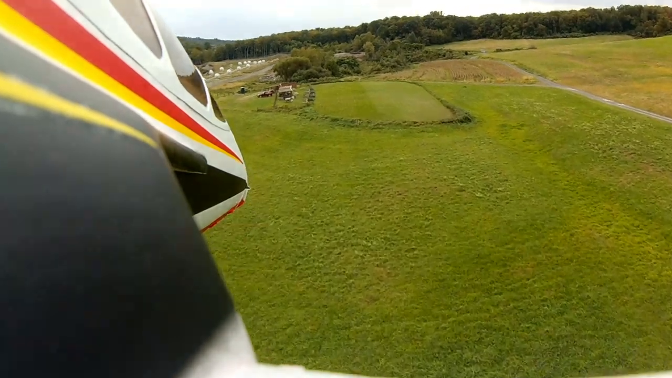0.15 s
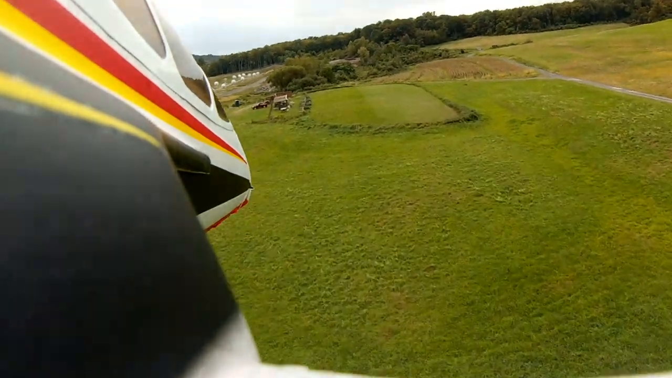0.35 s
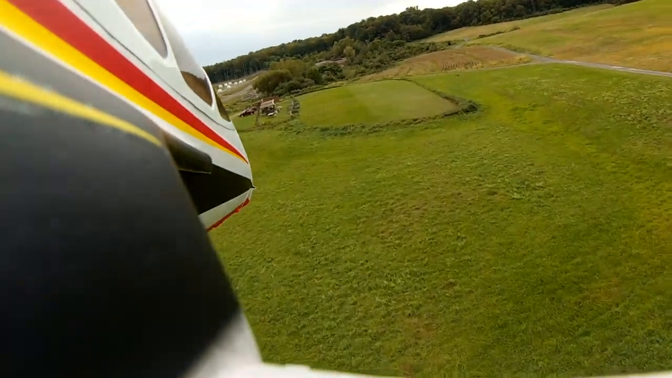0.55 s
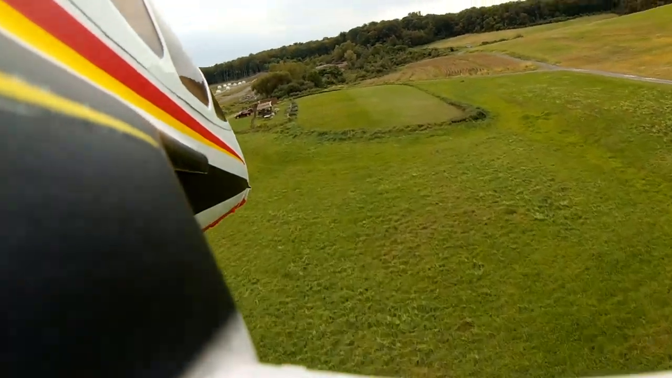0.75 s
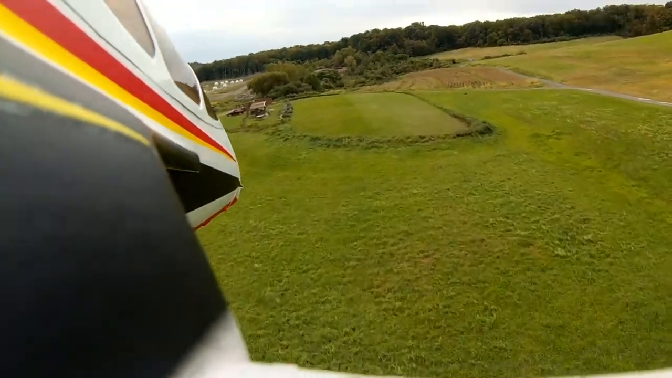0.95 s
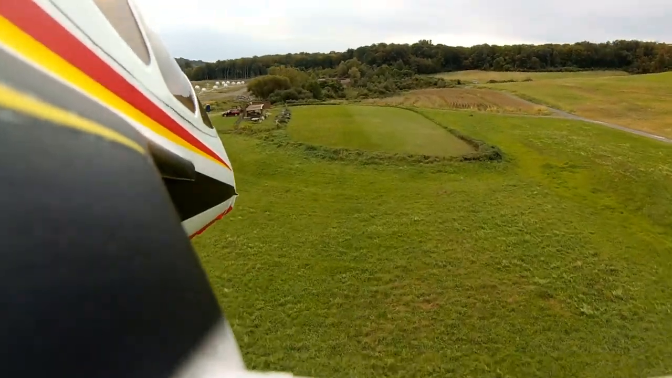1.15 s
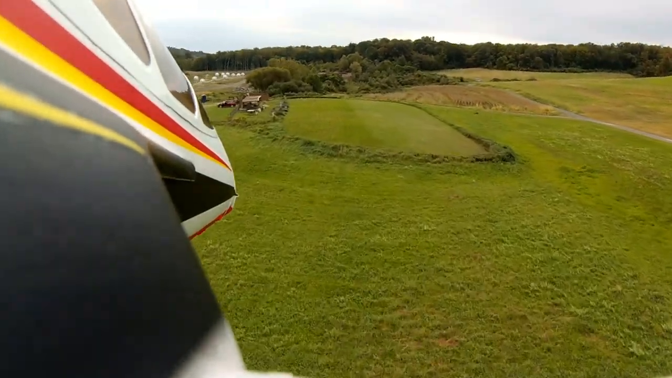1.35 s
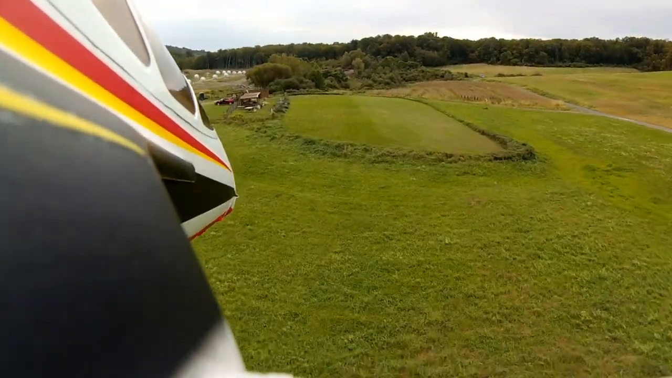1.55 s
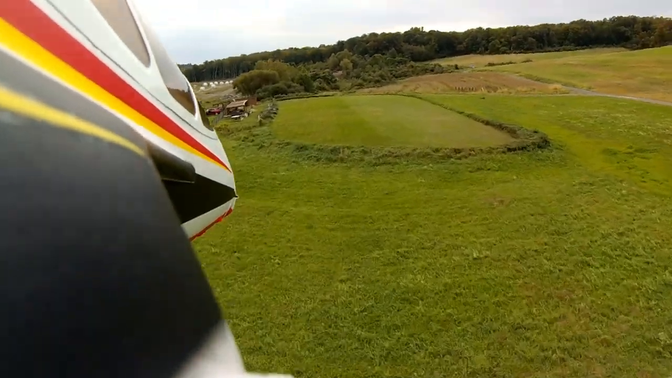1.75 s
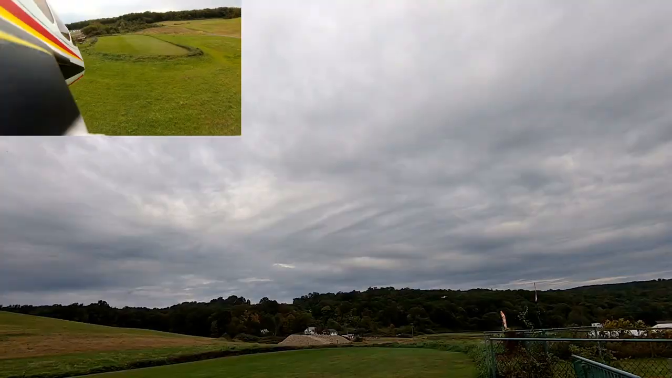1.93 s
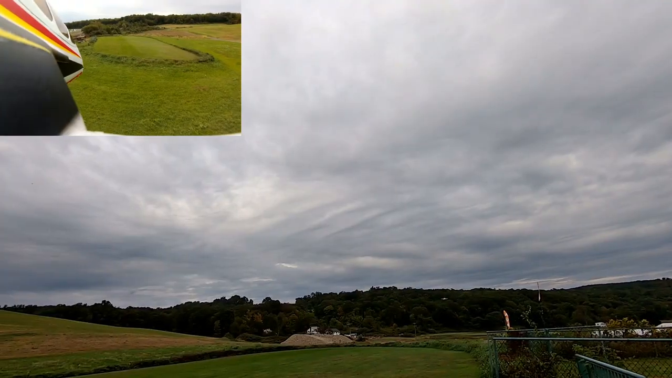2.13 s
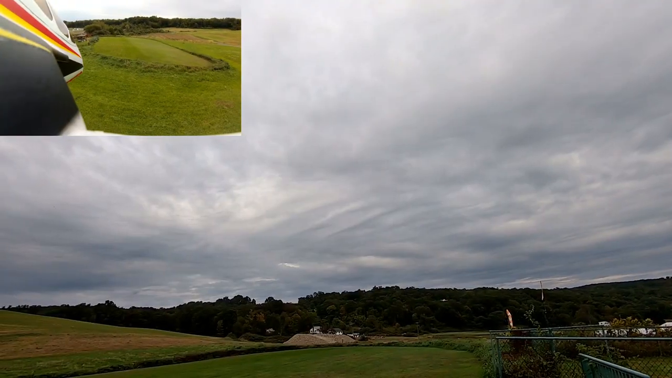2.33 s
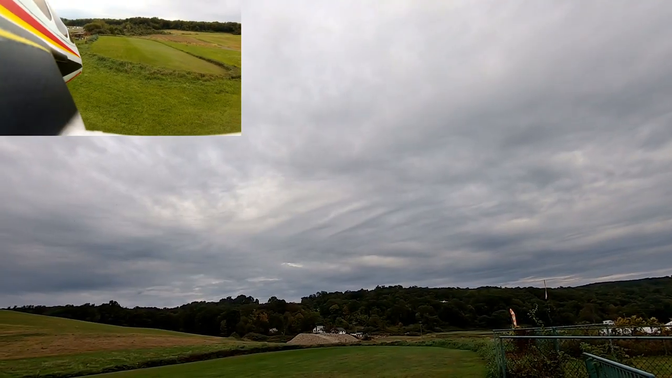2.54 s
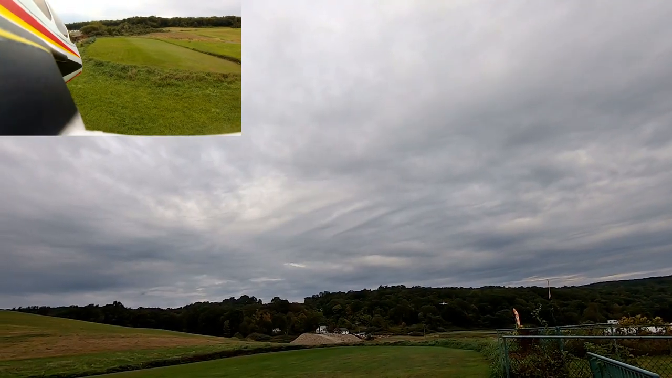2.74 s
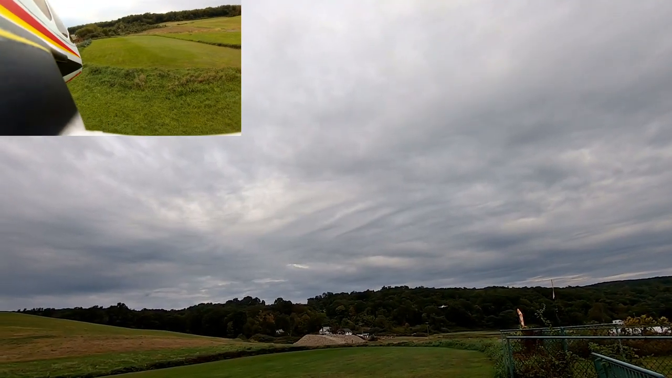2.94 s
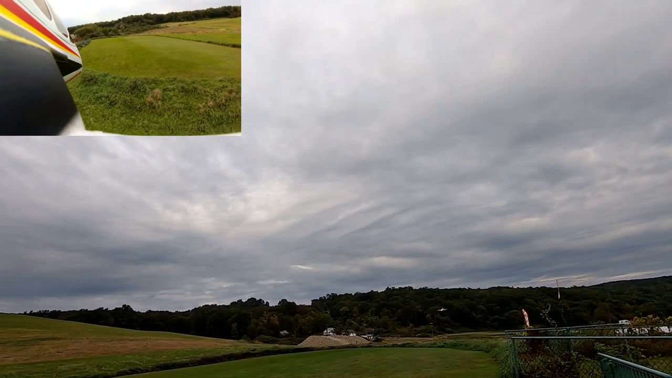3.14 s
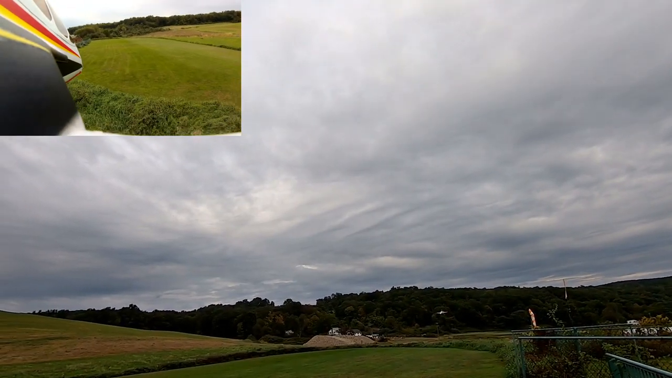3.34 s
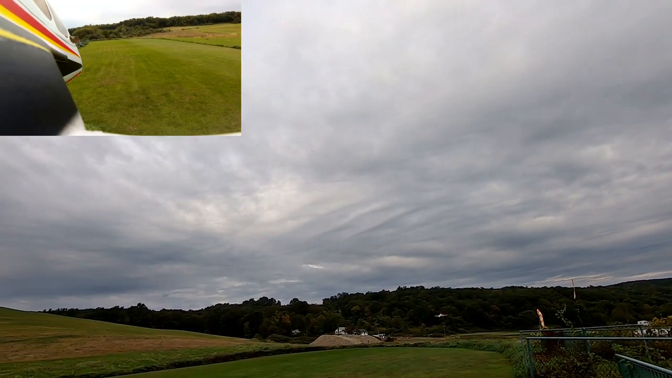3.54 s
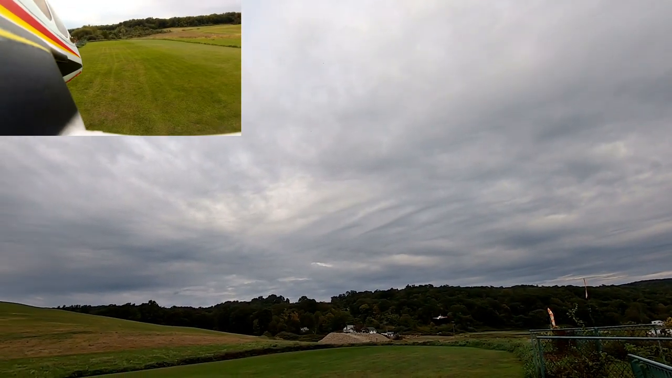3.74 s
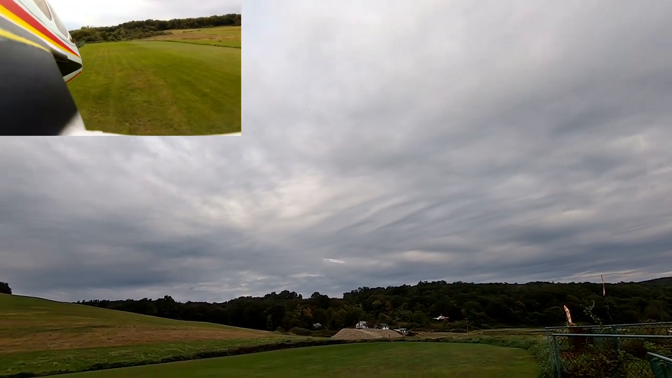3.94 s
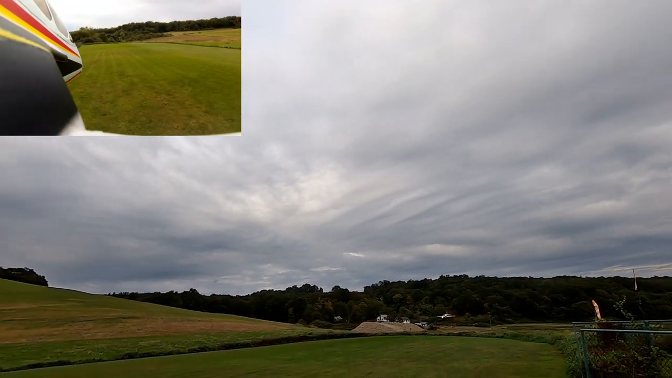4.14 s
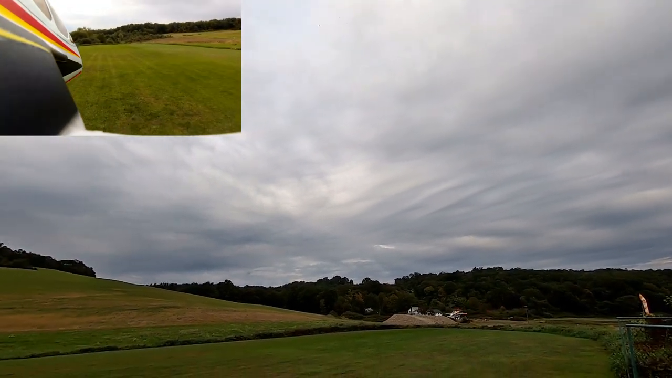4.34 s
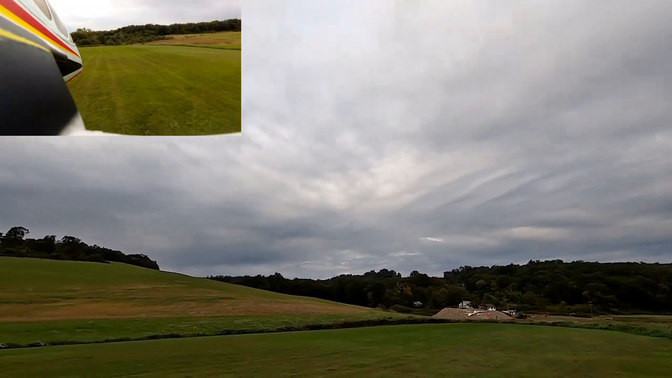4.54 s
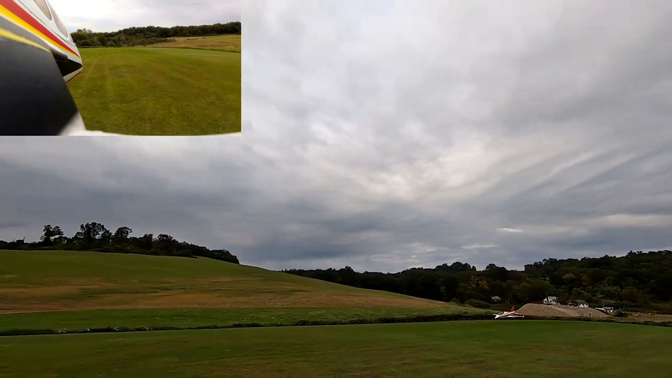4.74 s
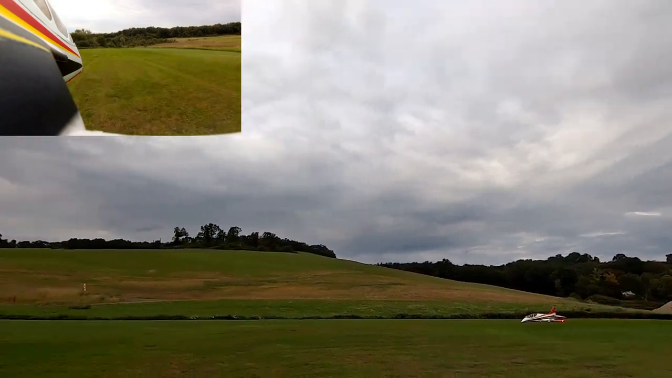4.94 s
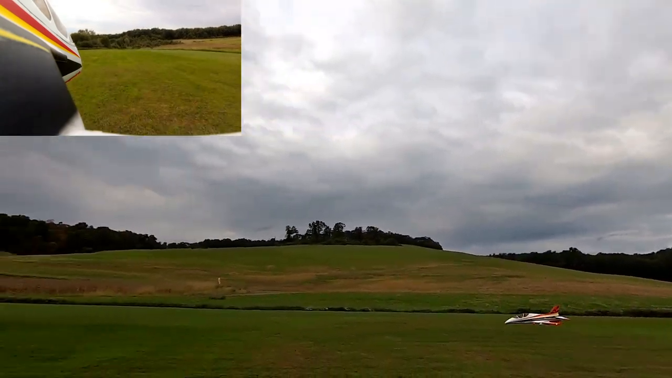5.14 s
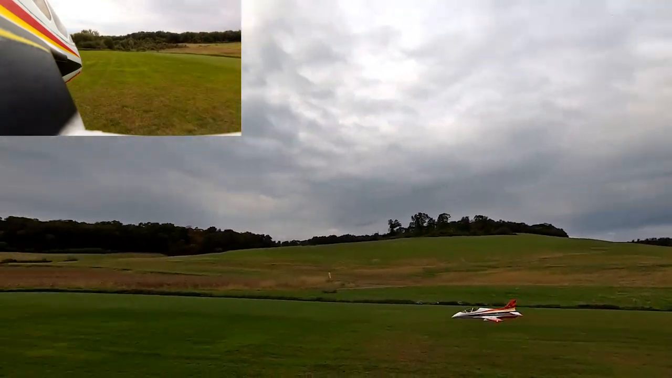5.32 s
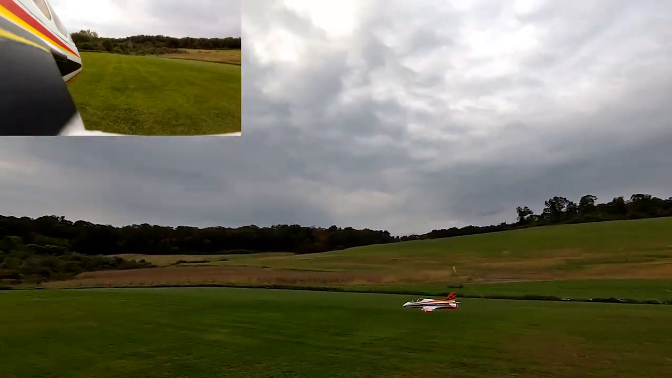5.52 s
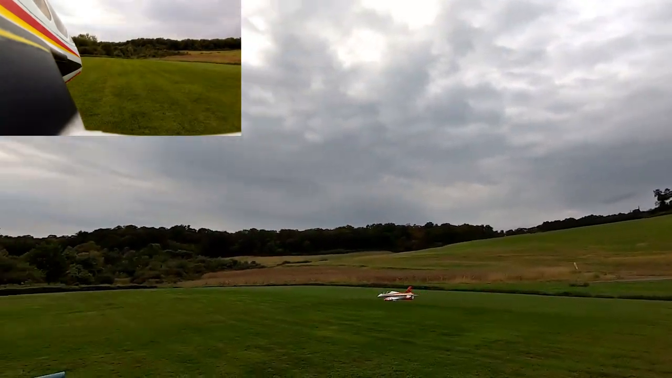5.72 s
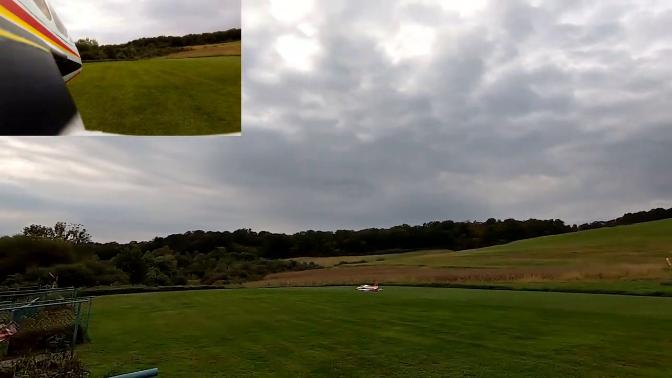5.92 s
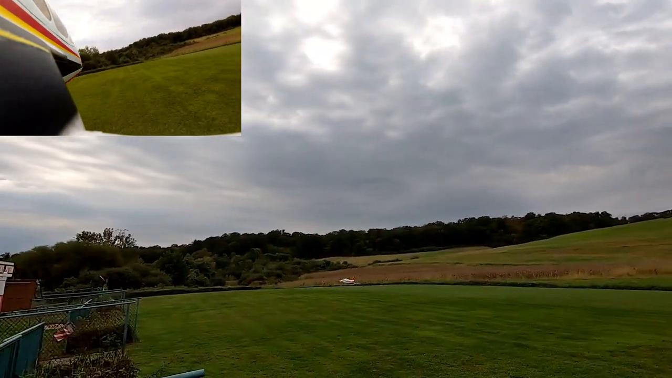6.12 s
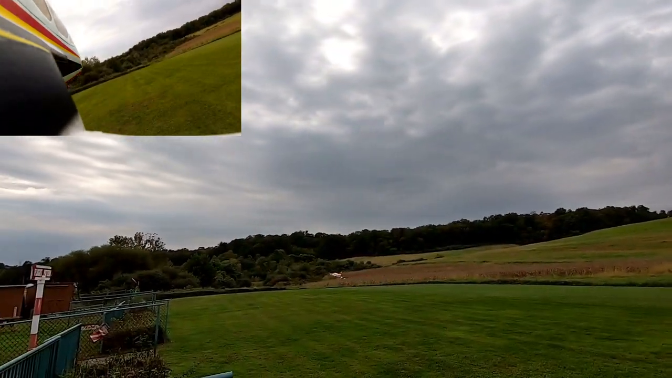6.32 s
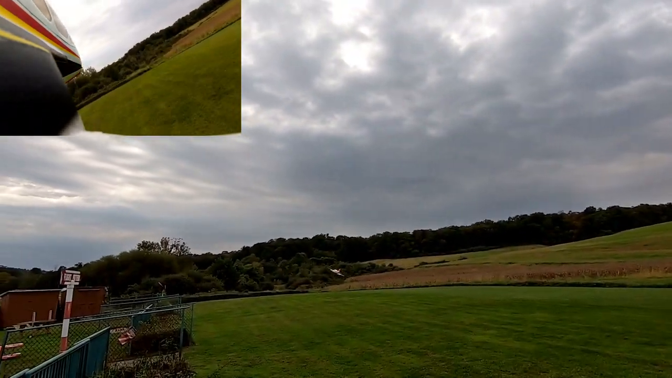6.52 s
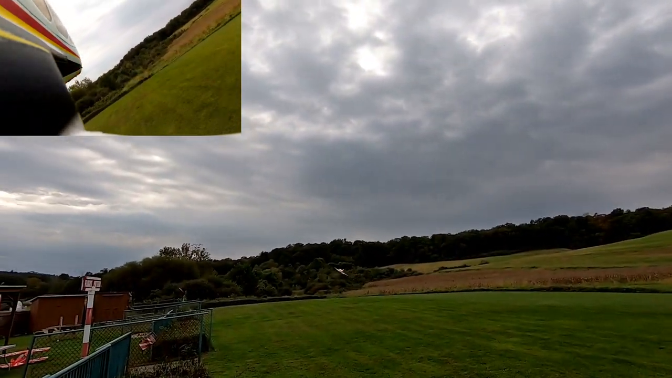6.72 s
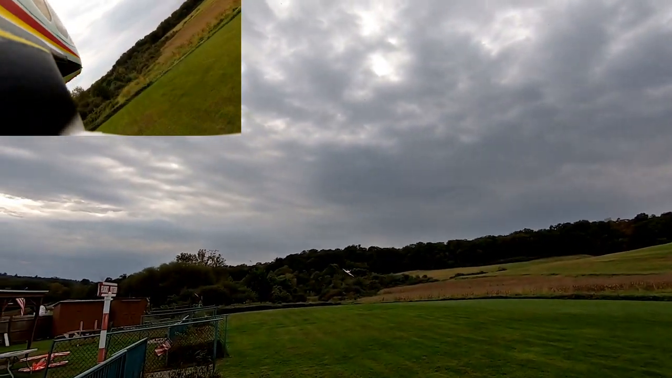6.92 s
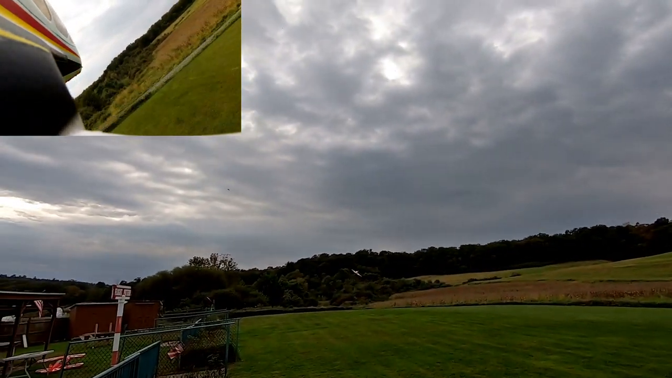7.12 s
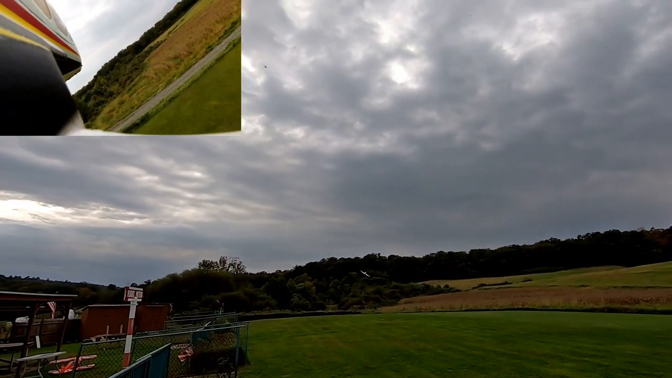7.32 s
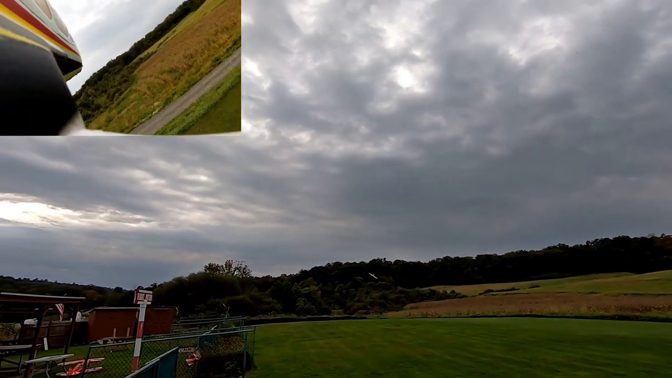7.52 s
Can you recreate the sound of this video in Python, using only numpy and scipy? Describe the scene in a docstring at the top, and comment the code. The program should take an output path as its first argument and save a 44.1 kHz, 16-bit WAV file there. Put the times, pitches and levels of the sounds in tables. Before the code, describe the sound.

Stereo outdoor pickup at a grass airfield: low far-off motor drone, uneven throb, soft traffic-like noise and a faint katydid. Airy fan noise with hollow, sweeping ground-reflection coloration builds gradually as a small electric jet nears. A soft thud precedes the pass; then the rotor pitch leaps, with a breathy howl and strong shrill whine, before the jet recedes into thinner rush and wavering tones.

```python
"""A distant engine drones and drops off over faint field noise; a low throb comes and goes, a katydid trills.
An electric ducted-fan model jet approaches low over grass, opens the throttle and flies away: shaped noise for
fan rush and exhaust roar, sines for the nine-blade rotor, a grass echo combing both with moving notches.
Clicks, a thud, a tiny chirp and wind puffs are short noises and tones, heard at two microphone ports."""
import sys
import numpy as np
from scipy import signal
from scipy.fft import rfft, irfft, next_fast_len
from scipy.io import wavfile
from scipy.ndimage import uniform_filter1d, map_coordinates

SR = 44100
rng = np.random.default_rng(int(sys.argv[2]) if len(sys.argv) > 2 else 0)


def file_out(sig):
    """Save sig as 16-bit WAV at sys.argv[1]."""
    # one column per channel
    cols = np.atleast_2d(sig).T
    # limit, then scale
    lim = np.clip(cols, -1, 1)
    pcm = np.round(lim * 32767).astype(np.int16)
    wavfile.write(sys.argv[1], SR, pcm)


N = 338230
TIME = np.arange(N) / SR
FRAME = 1024  # STFT length [samples]
TOP_HZ = 15500

# rotor speed as heard: cruise, sag, then throttle surges: (time [s], shaft rate [Hz])
SHAFT_SPEED = [(0, 296.5), (.38, 298), (.6, 312.5), (1, 313.6), (3, 312.6), (4, 311.7), (4.6, 310.4),
               (4.9, 308.6), (5.2, 303.7), (5.3, 301.6), (5.385, 297.3), (5.43, 312.4), (5.5, 324.5),
               (5.57, 345.5), (5.65, 364.3), (5.71, 369), (5.82, 383.5), (5.91, 389), (5.98, 412),
               (6.05, 416), (6.17, 418.6), (6.55, 416.1), (6.85, 413.6), (7.3, 411.9), (7.67, 412.5)]
BLADES, INERTIA_S = 9, .025  # inertia rounds off speed changes
# rotor tones before the grass comb:
# (time [s], shaft tone [dB], blade tone [dB], its 2nd harmonic [dB], its 3rd harmonic [dB])
ROTOR_LEVELS = [(0, -72, -69, -95, -105), (.6, -81, -67, -74, -105), (1.9, -81, -67.5, -72.5, -105),
                (2.2, -82, -66, -78, -105), (2.5, -82, -68, -70, -100), (2.9, -82, -66, -66, -95),
                (3.4, -66, -79, -63, -66.5), (3.8, -58.5, -60, -59, -71), (4.3, -51, -53, -52.5, -75),
                (4.55, -47.5, -53.5, -55.5, -64), (4.8, -46.5, -49, -67, -66),
                (5.25, -41, -46.5, -50.5, -56), (5.54, -45, -49.5, -51, -72), (5.6, -44, -38.5, -52, -70),
                (5.78, -44, -33, -41.5, -62), (5.9, -45.5, -35, -41, -57), (6.1, -52.5, -35, -43, -62),
                (6.22, -53.5, -37, -42.5, -78), (6.55, -61.5, -42, -41.5, -83), (6.7, -64, -46, -51, -88),
                (6.84, -66, -53, -58, -90), (6.93, -71, -50, -54, -95), (7.08, -69, -54, -59, -100),
                (7.17, -65, -51.5, -62, -100), (7.36, -66, -56.5, -66, -105), (7.43, -64, -48.5, -70, -105),
                (7.67, -77, -49, -75, -105)]
# brief dips of the blade tones: (time [s], 1/e half length [s], depth [dB])
WHINE_DIPS = [(5.837, 0.014, -25), (5.69, 0.027, -3.5), (6.016, 0.031, -7), (6.31, 0.0067, -11)]
TRAIL_DB = -14  # rough line, relative to the blade tone
# line at the controller's switching rate minus the 3rd blade harmonic
SWITCH_HZ, SWITCH_DB, SINGS_S, STOPS_S = 24000, -67, 5.8, 6.12

# air flow before the comb: (time [s], fan rush [dB], exhaust roar [dB])
FLOW_LEVELS = [(0, -64.5, -79), (.8, -59, -75.5), (1.6, -57, -68), (2.2, -54.5, -66), (2.6, -53, -65.5),
               (3.2, -49, -62), (3.8, -47.5, -59.5), (4.3, -45.5, -56), (5.05, -41.5, -47.5),
               (5.3, -43, -46.5), (5.5, -41.5, -41.5), (5.65, -37.5, -38.5), (5.8, -35, -37),
               (5.9, -35.5, -42), (6, -34.5, -38.5), (6.2, -35, -40), (6.6, -39, -42), (7, -42.5, -44),
               (7.67, -51.5, -46.5)]
# fan rush spectrum before tilt: (frequency [Hz], density [dB per Hz])
RUSH_SPECTRUM = [(900, -22), (1500, -12), (1900, -6.5), (2300, 1), (3000, 1), (3700, 1), (4500, -3),
                 (6500, -5.5), (8000, -12), (9500, -21), (10800, -25.5), (11800, -39), (14000, -37),
                 (15300, -62)]
# exhaust roar spectrum before modes and tilt: (frequency [Hz], density [dB per Hz])
ROAR_SPECTRUM = [(90, -13), (200, 0.5), (350, -8.5), (450, -15), (600, -5), (900, -8.5), (1250, -3.5),
                 (1450, -1.5), (1700, -7), (2300, -16.5), (4000, -46)]
# jet noise at the two ports: (frequency [Hz], left-right likeness [-1 to 1])
JET_LIKENESS = [(400, .99), (1000, .9), (2500, .93), (5000, .89), (9000, .72), (14000, .5)]
# duct pipe modes: (frequency [Hz], width [Hz], gain over the roar spectrum [dB])
DUCT_MODES = [(504, 6.3, -4), (772, 124, 8.5), (1032, 30, 2), (1106, 100, 2.5)]
# howls on tailpipe modes:
# (start [s], end [s], from [Hz], to [Hz], 1/e half width [octaves], gain over the roar spectrum [dB])
HOWLS = [(5.28, 5.68, 558, 523, 0.07, 19), (5.45, 5.62, 670, 617, .1, 11),
         (5.63, 5.873, 772, 755, 0.106, 8.5), (5.95, 6.22, 1010, 1000, .1, 3),
         (5.9, 6.55, 968, 946, 0.11, 9)]
HOWL_EDGE_S, HOWL_STAYS_DB = .04, 5
# bright band swooping down in the rush: (time [s], centre [Hz], gain over the rush spectrum [dB])
SWOOSH_BAND = [(4.4, 8200, 5), (4.6, 7700, 6), (4.85, 6700, 1), (5.1, 5830, 10), (5.3, 5450, 4),
               (5.45, 5400, 0)]
SWOOSH_WIDTH_HZ = 220
# valley in the flow noise: (start [s], end [s], centre [Hz], 1/e half width [Hz], depth [dB])
FLOW_VALLEY = (5, 8, 1445, 103, -6)
# rush tilt [dB per octave], bending near 4 kHz: grows with rush level, dulls once seen from behind
TILT_PER_DB, FLAT_AT_DB, BEHIND_S, DULL_DB_PER_S = 0.83, -48.5, 6.86, 4.5
NEAR_TILT_DB, NEAR_S, NEAR_SPAN_S = 3, 5.27, 0.58  # extra rush tilt while nearest
ROAR_TILT_DB, ROAR_DULL_DB_PER_S = -1, 1.2  # roar slope per octave; its dulling from behind

# grass echo: (time [s], notch spacing [Hz], strength [0-1])
GRASS_ECHO = [(0, 1190, .25), (.8, 1200, .35), (1.55, 1240, .5), (2, 1325, .62), (2.6, 1505, .72),
              (3, 1635, .8), (3.35, 1735, .8), (3.6, 1790, .68), (4.1, 1860, .55), (4.4, 1905, .52),
              (4.6, 1785, .55), (4.8, 1620, .52), (5.2, 1270, .4), (5.5, 1120, .35), (5.75, 1140, .3),
              (6, 1295, .45), (6.38, 1425, .5), (6.6, 1315, .48), (6.77, 1260, .4), (6.87, 955, .55),
              (7.1, 920, .68), (7.3, 890, .45), (7.5, 865, .6), (7.67, 850, .55)]
# treble loss in the grass: (frequency [Hz], share returned [0-1])
TURF_RETURN = [(1200, 1), (2600, 1), (3300, .7), (3900, 1), (7000, .95), (10000, .55), (14000, .2)]
GRAZING_TURN_RAD, CLIMB_TURN_RAD, CLIMB_S = 2.55, .85, 6.82  # echo phase turn before and after climbing away

# port levels at shading 1: (frequency [Hz], left over right [dB])
PORT_LEVELS = [(300, -.5), (450, -2.5), (700, -3.5), (1100, -14), (1450, -7), (1900, -6.5), (2400, -7),
               (3200, -4.5), (4500, -3.5), (5600, -5.5), (6600, -4.5), (7600, 10.5), (8500, -4.5),
               (15000, 2)]
# port phases: (frequency [Hz], left lead [rad])
PORT_PHASES = [(100, 0), (400, -.15), (850, -.45), (1100, .3), (1500, .9), (2100, -.1), (2700, .3),
               (4000, -.1), (5100, -1.1), (6400, -.3), (8000, -1), (10000, 2)]
# port shading factor: far, extra when abeam, and when
SHADE_FAR, SHADE_ABEAM, ABEAM_S, BUILD_S, FADE_S = 0.5, 0.87, 5.48, 3.2, 0.9

# distant engine, mean of the ports: (time [s], firing rate [Hz], firing tone [dB])
ENGINE = [(0, 131.5, -38.5), (.67, 131.8, -39), (.74, 135.7, -44), (1.05, 143.4, -45.5), (1.52, 150.9, -52),
          (1.9, 152.6, -49.5), (3.1, 152.8, -51), (5, 147.2, -50.5), (5.6, 147.2, -51), (6.2, 146.9, -53),
          (7.67, 146.5, -50)]
LOPE_S, STEADY_S, LOPES_PER_S, LOPE_DB = 0.738, 1.5, 7.85, 2.5
# low throb: (time [s], level [dB])
THROB_LEVEL = [(0, -62), (.25, -45), (.45, -47.5), (1.28, -63.5), (1.75, -54.5), (2.5, -59), (2.73, -45),
               (2.86, -66), (3.01, -45), (3.14, -59.5), (3.37, -46), (3.46, -60), (4.3, -66), (5.17, -55),
               (5.36, -77), (5.51, -53), (6.58, -58), (7.35, -73), (7.56, -52), (7.67, -73)]
# passing hums, mean of the ports: (start [s], end [s], end pitch [Hz], midway sag [Hz], level [dB])
FAINT_HUMS = [(.7, 2.4, 264, 0, -64), (.6, 1, 400, 0, -71), (3.1, 4.45, 248, 7, -63.5)]
HUM_FADE_S = .12

CHIRPS_PER_S, SLOWING_PER_S2 = 17.45, .15
TRILL_DB, GROWS_DB_PER_S, QUITS_S, QUIT_DB_PER_S = -74, 1, 3.9, 25

# soft thud: (start [s], rise [s], t60 [s], noise level before rise and decay [dB])
SOFT_THUD = (4.443, .006, .16, -48)
# thud spectrum: (frequency [Hz], density [dB per Hz])
THUD_SPECTRUM = [(250, -30), (450, 0), (900, -2), (1900, -4), (2600, -20), (4000, -60)]
# clicks: (start [s], level before attack and decay [dB], pitch [Hz])
CLICKS = [(1.8, -43, 430), (7.164, -44, 9000), (7.262, -50, 10000)]
# rising chirp: (centre time [s], 1/e half length [s], from [Hz], to [Hz], peak [dB])
GRASS_CHIRP = (2.373, .006, 3400, 4700, -55)

# far traffic and leaves: (frequency [Hz], density [dB per Hz])
FIELD_SPECTRUM = [(50, -44), (100, -8.5), (200, -11.5), (300, -15), (420, -22.5), (560, -34), (700, -25),
                  (780, -18), (860, -28.5), (1500, -31), (3000, -42), (7500, -27.5), (8400, -59),
                  (10000, -86)]
# far noise at the two ports: (frequency [Hz], left-right likeness [-1 to 1])
FIELD_LIKENESS = [(300, 0.78), (600, 0.12), (1200, .1)]
# wind puffs: (centre time [s], noise level at the peak [dB], 1/e half length [s])
WIND_PUFFS = [(.38, -56, 0.09), (4.36, -72, .06), (5.533, -59, 0.15), (6.05, -66, 0.1014),
              (7.567, -50, 0.079)]
FIELD_DB, BREEZE_DB = -57.0, -72.5  # mean levels


def amp(db):
    """Decibels to linear gain."""
    return 10 ** (np.asarray(db) / 20)


def unit(x):
    """Scale to rms 1."""
    return x / np.sqrt(np.mean(np.abs(x) ** 2) + 1e-20)


def along(points, hz):
    """Interpolate (Hz, value) points on a log-frequency axis."""
    f, v = np.transpose(points)
    return np.interp(np.log(hz + 1), np.log(f + 1), v)


def curves(rows, t=TIME):
    """Interpolate each column after the time."""
    s, *cols = np.transpose(rows)
    return [np.interp(t, s, c) for c in cols]


def bell(x):
    """Gaussian with 1/e half width 1."""
    return np.exp(-x ** 2)


def window(t, start, end, edge):
    """Soft switch: 1 between start and end, 0 outside."""
    return (np.tanh((t - start) / edge) - np.tanh((t - end) / edge)) / 2


def wobble(rate):
    """Smooth random curve with rate knots a second."""
    knots = rng.standard_normal(int(N * rate / SR) + 4)
    return map_coordinates(knots, [TIME * rate])


def filtered(x, response):
    """Apply a response of frequency."""
    m = next_fast_len(N + 8192)
    return irfft(rfft(x, m) * response(np.fft.rfftfreq(m, 1 / SR)), m)[..., :N]


def likeness_angle(alike, hz):
    """Mid/side mixing angle giving the wanted left-right correlation."""
    return np.arccos(np.clip(along(alike, hz), -1, 1)) / 2


def noise(spectrum, alike):
    """Stereo noise of rms 1 with given spectrum and likeness."""
    def response(hz):
        angle = likeness_angle(alike, hz)
        return amp(along(spectrum, hz)) * [np.cos(angle), np.sin(angle)]
    mid, side = filtered(rng.standard_normal((2, N)), response)
    return unit(np.array([mid + side, mid - side]))


def tone(hz, db, drift, flutter_db, rate):
    """Sine of rms db whose phase [rad] and level waver in turbulent air."""
    phase = 2 * np.pi * np.cumsum(hz) / SR + drift * wobble(rate)
    return np.sqrt(2) * amp(db + flutter_db * wobble(rate)) * np.sin(phase)


def shaft():
    """Rotor speed in Hz, rounded off by inertia."""
    return uniform_filter1d(curves(SHAFT_SPEED)[0], round(INERTIA_S * SR), mode="nearest")


def rotor():
    """Imbalance hums at shaft speed; blades whine at their passing rate and its harmonics."""
    shaft_hz = shaft()
    shaft_db, *blade_dbs = curves(ROTOR_LEVELS)
    whine = tone(shaft_hz, shaft_db, drift=0.3, flutter_db=1.5, rate=15)
    dips_db = sum(db * bell((TIME - s) / length) for s, length, db in WHINE_DIPS)
    # speeding up disturbs the inflow: blade tones roughen, the 2nd harmonic most
    acceleration = uniform_filter1d(np.gradient(shaft_hz) * SR, SR // 10)
    surge = np.clip(acceleration / 150, 0, 1)
    for harmonic, db in enumerate(blade_dbs, 1):
        breakup_db = 3 * surge * (harmonic == 2)
        whine = whine + tone(harmonic * BLADES * shaft_hz, db + dips_db - breakup_db / 2,
                             drift=0.33 + .3 * surge, flutter_db=1.13 + surge + breakup_db, rate=28)
    # rough line one shaft multiple under the blade tone
    trail = tone((BLADES - 1) * shaft_hz, blade_dbs[0] + TRAIL_DB, drift=1.5, flutter_db=3, rate=40)
    switching = tone(SWITCH_HZ - 3 * BLADES * shaft_hz, SWITCH_DB, drift=.3, flutter_db=2, rate=28)
    return whine + surge * trail + window(TIME, SINGS_S, STOPS_S, .04) * switching


def fan_rush(hz, t, rush_db, behind_s):
    """Fan turbulence: noise gains that brighten with level and hump around the blade rate."""
    # air takes more treble from the far jet
    tilt_db = TILT_PER_DB * (rush_db - FLAT_AT_DB) - DULL_DB_PER_S * behind_s
    tilt_db = tilt_db + NEAR_TILT_DB * bell((t - NEAR_S) / NEAR_SPAN_S)
    octaves = np.log2(1 + np.minimum(hz, 10000) / 4000)
    # turbulence cut by the blades piles up around their passing rate
    blade_hz = BLADES * curves(SHAFT_SPEED, t)[0]
    hump = 1 + 0.55 * window(t, -np.inf, BEHIND_S, 0.29) * bell((hz - blade_hz) / 400)
    swoosh_hz, swoosh_db = curves(SWOOSH_BAND, t)
    swoosh = amp(swoosh_db * bell((hz - swoosh_hz) / SWOOSH_WIDTH_HZ))
    return amp(along(RUSH_SPECTRUM, hz) + tilt_db * octaves) * hump * swoosh


def exhaust_roar(hz, t, behind_s):
    """Exhaust turbulence: noise gains raised at duct modes and passing tailpipe howls."""
    def peak(howl_hz, width):
        return bell(np.log2((hz + 1) / howl_hz) / width)
    modes_db = sum(db / (1 + (2 * (hz - mode_hz) / width_hz) ** 2) for mode_hz, width_hz, db in DUCT_MODES)
    for start, end, from_hz, to_hz, width, db in HOWLS:
        howl_hz = np.interp(t, [start, end], [from_hz, to_hz])
        modes_db = modes_db + db * window(t, start, end, HOWL_EDGE_S) * peak(howl_hz, width)
    # the last howl's mode stays slightly raised
    _, end, _, last_hz, width, _ = HOWLS[-1]
    modes_db = modes_db + HOWL_STAYS_DB * window(t, end, np.inf, HOWL_EDGE_S) * peak(last_hz, width)
    tilt_db = ROAR_TILT_DB - ROAR_DULL_DB_PER_S * behind_s
    octaves = np.log2(np.clip(hz, 400, 1300) / 750)
    return amp(along(ROAR_SPECTRUM, hz) + modes_db + tilt_db * octaves)


def patches(shape, bins, frames):
    """Random time-frequency patches of rms 1."""
    rough = rng.standard_normal(shape)
    return unit(uniform_filter1d(uniform_filter1d(rough, bins, 0), frames, 1))


def grass_comb(hz, t, shape):
    """Direct sound plus a delayed, phase-turned ground echo: a comb of moving notches."""
    spacing_hz, strength = curves(GRASS_ECHO, t)
    # soft ground turns the grazing echo nearly upside down and scatters its treble
    turn_rad = GRAZING_TURN_RAD + (CLIMB_TURN_RAD - GRAZING_TURN_RAD) * window(t, CLIMB_S, np.inf, .05)
    echo = np.clip(strength, 0, 1) * along(TURF_RETURN, hz)
    echo = echo * np.exp(-1j * (2 * np.pi * hz / spacing_hz + turn_rad))
    # uneven turf varies the echo by band and moment
    echo = echo * np.clip(1 + 0.18 * patches(shape, 25, 16), 0, 1.2)
    return (1 + echo) / np.sqrt(1 + strength ** 2)


def port_shade(hz, t):
    """The microphone body shades one port, most when the jet is abeam."""
    span_s = np.where(t < ABEAM_S, BUILD_S, FADE_S)
    shading = SHADE_FAR + SHADE_ABEAM * np.exp(-np.abs(t - ABEAM_S) / span_s)
    # half to each port, in opposite senses
    return amp(shading * along(PORT_LEVELS, hz) / 2) * np.exp(.5j * along(PORT_PHASES, hz))


def jet():
    """Rush, roar and rotor tones, combed by the grass, as the two ports receive them."""
    sources = np.array([*rng.standard_normal((2, N)), rotor()])
    hz, t, (mid_noise, side_noise, whine) = signal.stft(sources, SR, nperseg=FRAME)
    hz = hz[:, None]
    rush_db, roar_db = curves(FLOW_LEVELS, t)
    behind_s = np.clip(t - BEHIND_S, 0, None)

    def per_bin(gain):  # rms 1 over frequency
        return gain / np.sqrt(np.mean(gain ** 2, axis=0))
    rush = amp(rush_db) * per_bin(fan_rush(hz, t, rush_db, behind_s))
    roar = amp(roar_db) * per_bin(exhaust_roar(hz, t, behind_s))
    start, end, valley_hz, width_hz, depth_db = FLOW_VALLEY
    valley = amp(depth_db * window(t, start, end, 0.12) * bell((hz - valley_hz) / width_hz))
    comb = grass_comb(hz, t, whine.shape)
    flow = np.hypot(rush, roar) * valley * comb * amp(0.75 * patches(whine.shape, 9, 4))
    angle = likeness_angle(JET_LIKENESS, hz)
    mid = mid_noise * flow * np.cos(angle) + whine * comb
    side = side_noise * flow * np.sin(angle)
    shade = port_shade(hz, t)
    ports = np.array([(mid + side) * shade, (mid - side) / shade])
    return signal.istft(ports, SR, nperseg=FRAME)[1][:, :N]


def drone():
    """Far engine: firing tone and two overtones, with faint hums and an uneven low noise throb."""
    hz, db = curves(ENGINE)
    loping = window(TIME, LOPE_S - .05, STEADY_S, .05)
    lope_db = -LOPE_DB * loping * np.cos(2 * np.pi * LOPES_PER_S * (TIME - LOPE_S))
    tones = tone(hz, db + lope_db, drift=.25, flutter_db=1.5, rate=10)
    tones = tones + tone(2 * hz, 1.132 * db - 10.0, drift=0.7, flutter_db=-1.0, rate=10)
    # third fades twice as fast in dB as the firing tone
    tones = tones + tone(3 * hz, 2 * db + 11.5, drift=0.55, flutter_db=4.0, rate=6.4)
    for start, end, end_hz, sag_hz, hum_db in FAINT_HUMS:
        progress = np.clip((TIME - start) / (end - start), 0, 1)
        hum_hz = end_hz - sag_hz * np.sin(np.pi * progress)
        hum = tone(hum_hz, hum_db, drift=0.6, flutter_db=2.5, rate=9.1)
        tones = tones + window(TIME, start, end, HUM_FADE_S) * hum
    throb_spectrum = [(45, -29.5), (68, -9.5), (76, -2.5), (84, -21.0), (115, -23.0), (300, -90)]
    throb = amp(*curves(THROB_LEVEL)) * noise(throb_spectrum, [(76, 1.0)])
    ports_db = [[-.2], [.2]]  # left, right
    return tones * amp(ports_db) + throb


def katydid():
    """Each wing stroke is a rough burst, as of tooth clicks, sliding down the wing's resonance."""
    cycle = (np.cumsum(CHIRPS_PER_S - SLOWING_PER_S2 * TIME) / SR + .98) % 1
    db = TRILL_DB + GROWS_DB_PER_S * TIME - QUIT_DB_PER_S * np.clip(TIME - QUITS_S, 0, None)
    stroke = np.exp(-((cycle - .2) / 0.16) ** 4)
    teeth = amp(2.5 * wobble(500))
    pitch_hz = 7800 - 900 * (np.clip(cycle, 0, .4) - .2)
    trill = unit(stroke * teeth * np.sin(2 * np.pi * np.cumsum(pitch_hz) / SR))
    ports_db = [[.5], [-.5]]  # left, right
    return amp(db + wobble(11)) * trill * amp(ports_db)


def thud():
    """Soft, loose thud: a short decaying puff of low-mid noise."""
    start, rise, t60, db = SOFT_THUD
    u = np.clip(TIME - start, 0, None)
    envelope = amp(db - 60 * u / t60) * (1 - np.exp(-u / rise))
    return envelope * noise(THUD_SPECTRUM, [(1000, 1.0)])


def ticks():
    """Short dry clicks: a few cycles of a rough, heavily damped ring."""
    out, t = np.zeros(N), np.arange(512) / SR
    for start, db, hz in CLICKS:
        walk = rng.standard_normal(len(t)).cumsum()
        roughness = .5 * uniform_filter1d(walk, int(SR / hz / 2) + 1) * np.sqrt(hz / 9000)
        ring = np.sin(2 * np.pi * hz * t + roughness)
        envelope = amp(db - 60 * t / (.003 + 6 / hz)) * (1 - np.exp(-t * hz / 0.2))
        out[round(start * SR):][:len(t)] += envelope * ring
    return out


def chirp():
    """Tiny chirp in the grass: one short sine sliding upward."""
    centre, half_length, from_hz, to_hz, db = GRASS_CHIRP
    u = (TIME - centre) / half_length
    hz = from_hz + (to_hz - from_hz) * np.clip((u + 1) / 2, 0, 1)
    return amp(db) * np.exp(-u ** 4) * np.sin(2 * np.pi * np.cumsum(hz) / SR)


def field():
    """Gently wavering far noise, with low-frequency breeze and wind puffs on the ports."""
    puffs = sum(amp(db) * bell((TIME - s) / half) for s, db, half in WIND_PUFFS)
    wind_spectrum = [(10, -19.5), (25, -16), (45, 6), (70, -6.0), (120, -32), (400, -70)]
    wind_level = amp(BREEZE_DB + 3 * wobble(3.4)) + puffs
    wind = wind_level * noise(wind_spectrum, [(25, -.2), (60, .4)])
    return amp(FIELD_DB + .8 * wobble(3)) * noise(FIELD_SPECTRUM, FIELD_LIKENESS) + wind


def scene():
    """Sum of all sources at the two ports."""
    return jet() + drone() + katydid() + thud() + ticks() + chirp() + field()


def record(dry):
    """Band limit: nothing passes from TOP_HZ up."""
    return filtered(dry, lambda hz: hz < TOP_HZ)


dry = scene()
out = record(dry)
file_out(out)
```